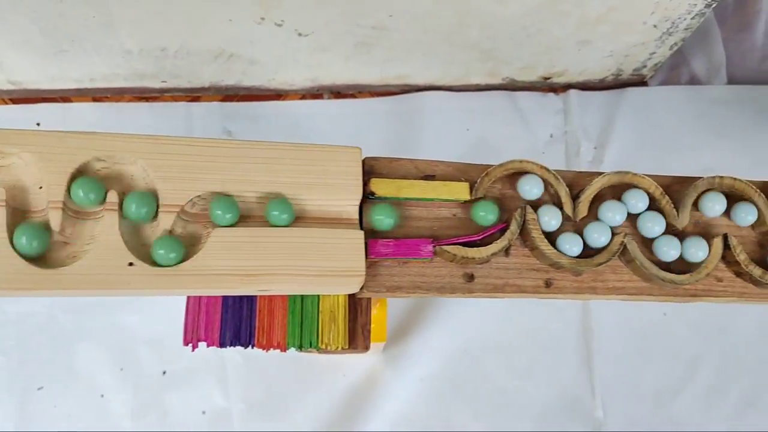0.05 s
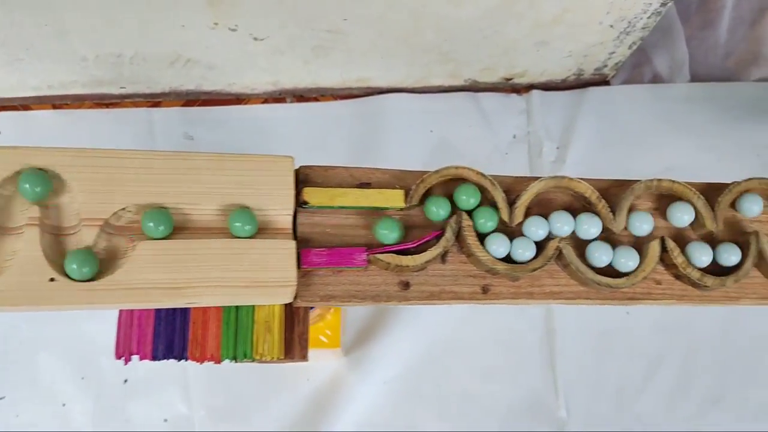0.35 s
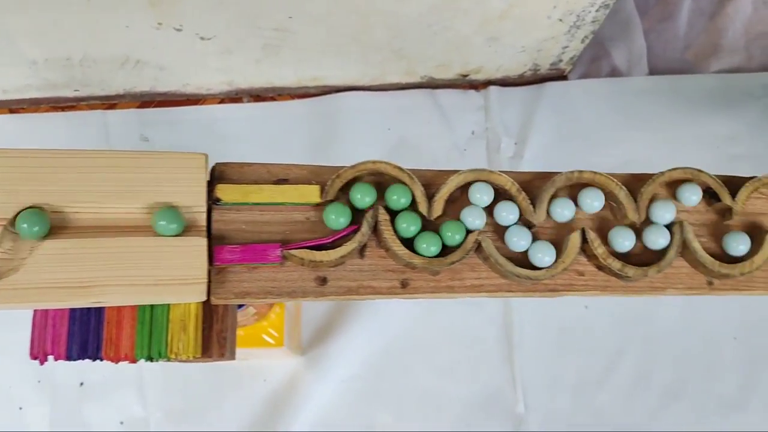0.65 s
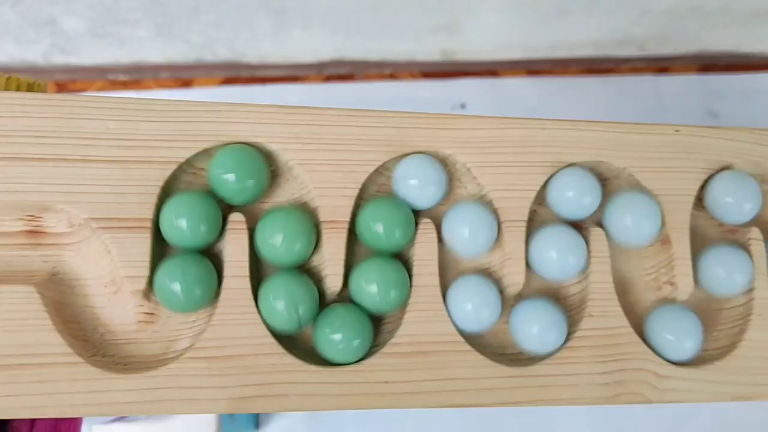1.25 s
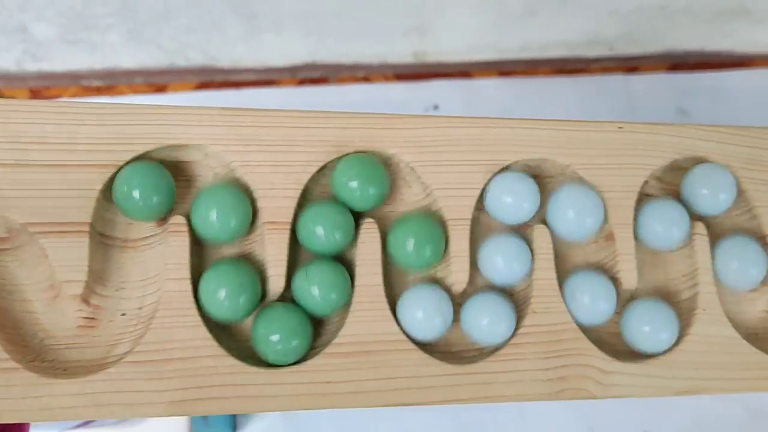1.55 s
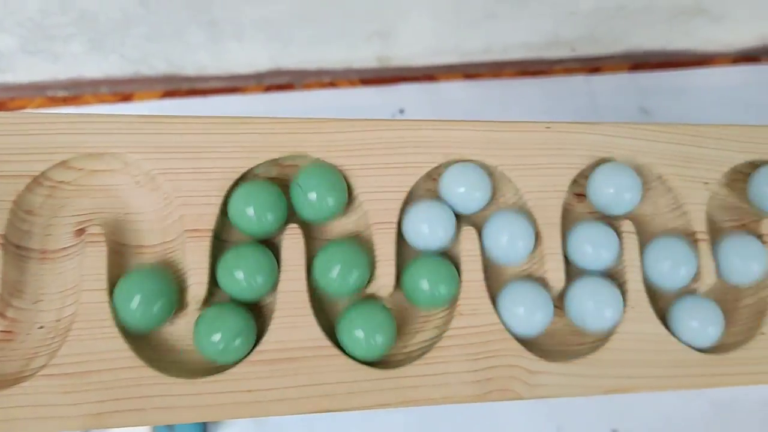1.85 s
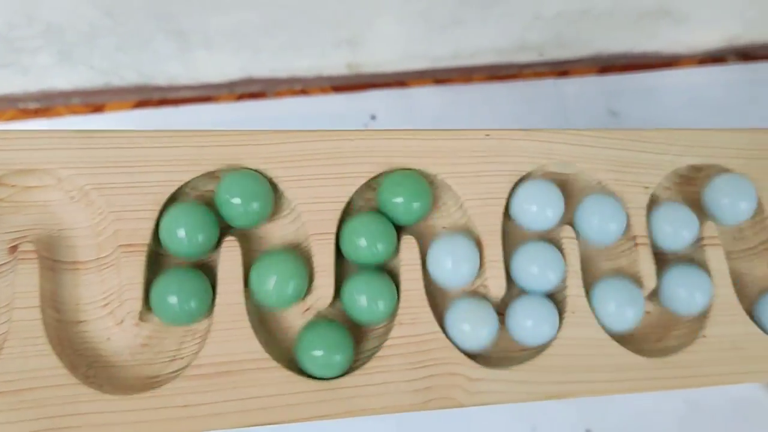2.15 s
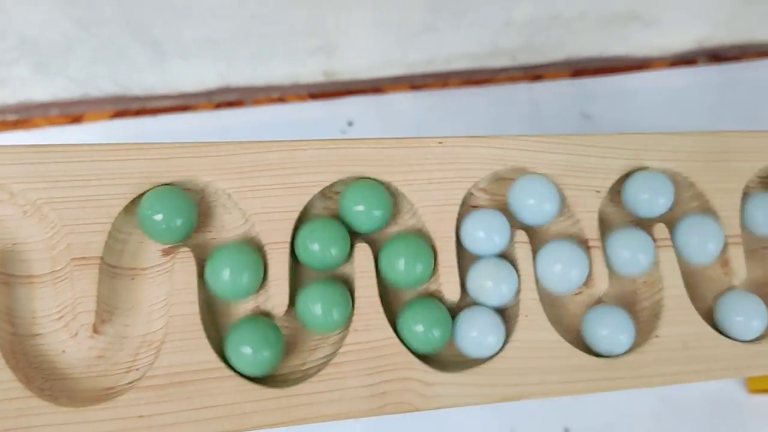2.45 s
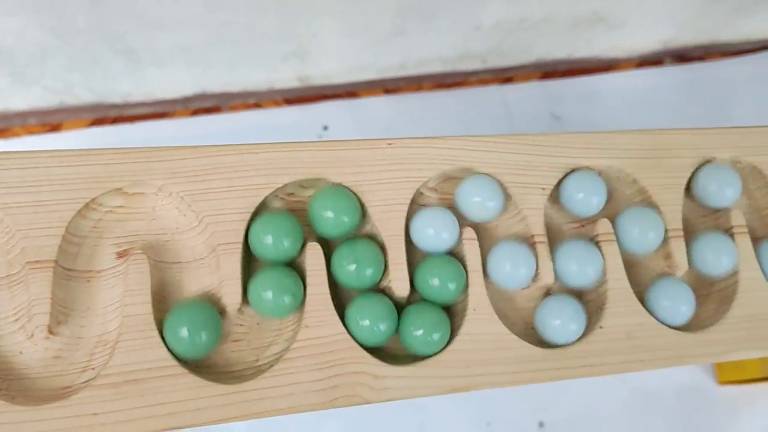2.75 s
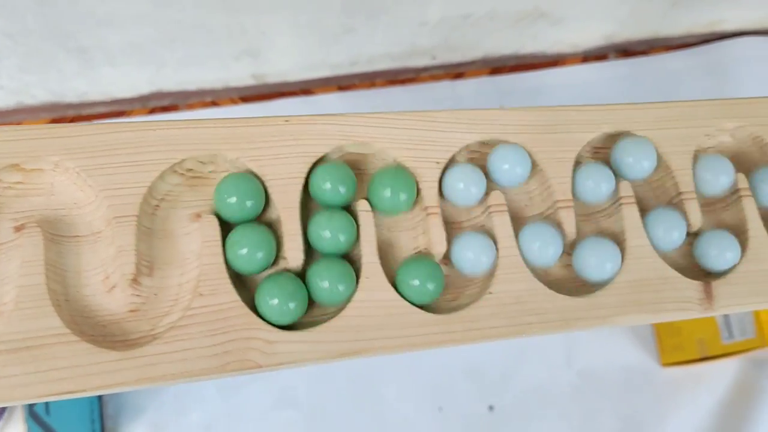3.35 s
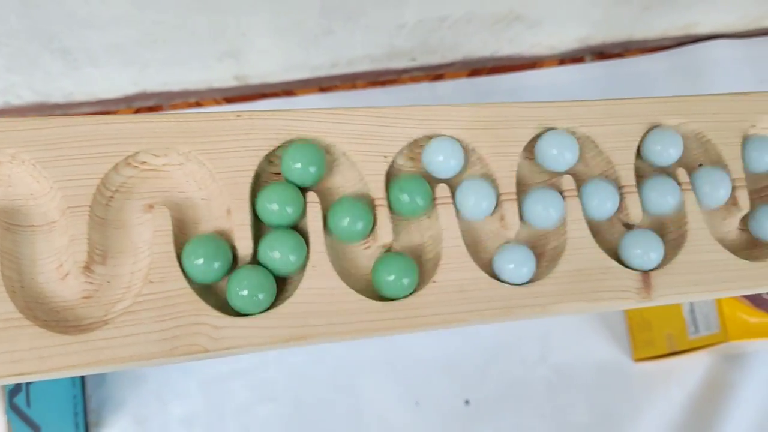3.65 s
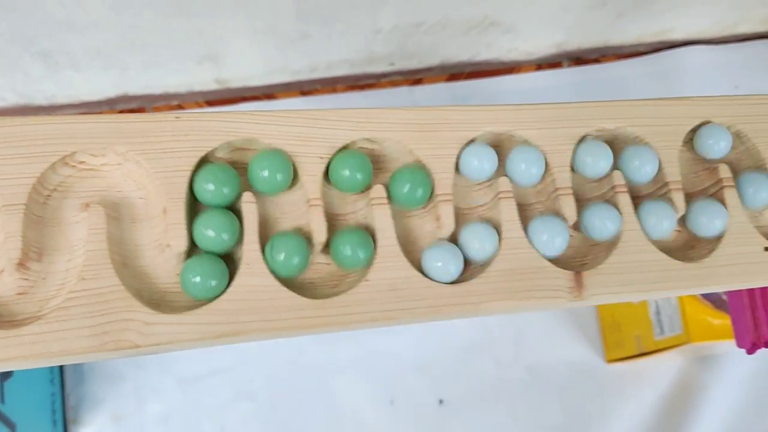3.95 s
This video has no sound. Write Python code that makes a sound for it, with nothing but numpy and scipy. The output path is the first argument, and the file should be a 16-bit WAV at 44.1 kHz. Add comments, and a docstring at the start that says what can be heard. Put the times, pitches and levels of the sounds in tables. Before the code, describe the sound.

Glass marbles roll on wood throughout, in a small room. For the first 1.4 seconds they rattle down a thin run with bright taps, knocks and scattered clicks over a soft rumble. At about 1.5 seconds the sound turns closer, deeper and a little louder as they wind through a thick grooved board. Rapid, irregular wooden knocks and glassy clacks continue over a dull rumble until about 4 seconds.

```python
"""Glass marbles on wood

Marbles roll down a thin wooden run, then, heard closer, along a winding groove in a thick board.
Rolling is a stream of tiny blows that ring the wood; marbles knock on bends and clack together.
The boards and their support rumble under the weight, in a small room."""
import sys
import numpy as np
from scipy import signal
from scipy.fft import rfft, irfft, next_fast_len
from scipy.io import wavfile

SR = 44100
rng = np.random.default_rng(int(sys.argv[2]) if len(sys.argv) > 2 else 0)


def to_wav(s):
    """Save 16-bit WAV."""
    ch = np.atleast_2d(s).T  # columns
    pcm = np.round(np.clip(ch, -1, 1) * 32767)  # PCM
    wavfile.write(sys.argv[1], SR, pcm.astype(np.int16))


N = 176400
BUMPS_PER_S, RATTLES_PER_S = 420, 220
RING_SAMPLES, WIDE_HZ = int(0.2 * SR), 810
SIDES = np.array([[1], [-1]])  # left, right


# Rolling on the run: t/s, level/dB
RUN_ROLL = [(0, -23.5), (.05, -26.5), (.1, -28), (.26, -29.5), (.31, -30.5), (.38, -29), (.45, -28.5),
            (.55, -32), (.61, -25.5), (.665, -36), (.7, -27), (.78, -29), (.9, -31), (1, -33.5),
            (1.199, -36), (1.4, -31.5)]
# Taps on the first bends: t/s, level/dB
HEAD_TAPS = [(0.002, -17), (0.014, -15.5), (0.033, -12), (0.048, -14), (0.072, -20), (0.157, -19),
             (0.199, -25), (0.216, -16.5), (0.241, -21), (0.274, -19.5)]
# Bright modes there: f/Hz, level/dB, t60/s, left-right/dB
HEAD_MODES = [(1774, -1.5, 0.062, -16), (2602, 2, 0.066, -7.5)]
# Marble on wood: t/s, level/dB
RUN_KNOCKS = [(0.017, -11), (0.0362, -11.5), (0.0708, -18), (0.136, -5), (0.2528, -7.5), (0.3345, -8.5),
              (0.365, -11.5), (0.389, -14.5), (0.4773, -6), (0.565, -18.5), (0.597, -4.5), (0.62, -23),
              (0.6902, -10.5), (0.7243, -16), (0.7614, -9), (0.7904, -13.5), (0.9333, -18.5), (0.9454, -5),
              (0.9748, -12.5), (0.997, -17), (1.048, -16.5), (1.1274, -16)]
# Marble on marble: t/s, level/dB, left-right/dB
RUN_CLACKS = [(0.03, -30, 11), (0.097, -28, 10), (0.236, -32, 11), (0.284, -25.5, 6), (0.352, -24.5, 6),
              (0.3804, -22.5, 6), (0.458, -14, 1.5), (0.575, -16, 3), (0.6131, -22, 2), (0.6737, -31, 8),
              (0.691, -25, 8), (0.706, -29, 1), (0.767, -22.5, 7), (0.8637, -11.5, 1.5), (0.9728, -27.5, 8),
              (1.0399, -12, -1.5), (1.059, -20.5, 0), (1.112, -29, 6), (1.127, -17.5, 4), (1.159, -28, 9),
              (1.2094, -24, 3), (1.264, -24.5, 2), (1.3177, -25, 7), (1.3597, -19, -0.5),
              (1.4013, -25.5, 3), (1.428, -24, 3)]
# Glass contact spectrum: f/Hz, level/dB
RUN_GLASS = [(1000, -0.5), (3000, -3.5), (4300, 0.5), (5500, -2), (7000, 1), (8000, -6.5), (9500, 0.5),
             (11000, -3), (12000, -2.5), (14000, -10.5), (16000, -15)]
def thin_run(roll_gain):
    """Marbles roll, rattle, tap, knock and clack on the thin run."""
    bumps = stream(lambda: run_blow(ring_db=-4), BUMPS_PER_S, scatter_db=1)
    roll = colour(follow(bumps, RUN_ROLL) * amp(1), [(300, 10.5), (1000, 8.5), (2500, -0.5), (6000, 1.5)])
    rattle = stream(lambda: clack(RUN_GLASS), RATTLES_PER_S, scatter_db=7)
    swell = [(0, -42.5), (.4, -37.5), (.53, -47), (.7, -34.5), (.98, -46.5), (1.2, -41.5), (1.4, -43)]
    out = (roll + follow(rattle, swell)) * roll_gain
    for t, db in HEAD_TAPS:
        add(out, t, amp(db + 24.5) * ring(HEAD_MODES, scatter_db=0, detune=0.0059, spread=0.34))
    for t, db in RUN_KNOCKS:
        add(out, t, amp(db + 19.5) * run_blow(ring_db=-6.5))
    for t, db, pan_db in RUN_CLACKS:
        add(out, t, amp(db + 19.5 + SIDES * pan_db / 2) * clack(RUN_GLASS))
    return out


# Rolling in the groove: t/s, level/dB
BOARD_ROLL = [(1.38, -17), (1.47, -18), (1.6, -21), (1.65, -16), (1.76, -20.5), (2.01, -23.5),
              (2.08, -28.5), (2.49, -23.5), (2.78, -26.5), (3.2, -24.5), (3.38, -27), (3.8, -26),
              (3.98, -22)]
# Knocks on the bends: t/s, level/dB, low body/dB, hard edge/dB
BOARD_KNOCKS = [(1.425, -14, -21, -37), (1.466, -9, 9, -9), (1.494, -11, -21, -42), (1.531, -34, 14, -28),
                (1.572, -7, -1.5, -18), (1.598, -9.5, -4, -29), (1.648, -11, -1, -32),
                (1.686, -4, -22, -11), (1.745, -4, -25, -5.5), (1.81, -8.5, -11, -19.5),
                (1.858, -7, -6.5, -31.5), (1.883, -9.5, -16, -27), (1.947, -11, -1, -16),
                (1.987, -7.5, -3.5, -8), (2.101, -14, -14, -14), (2.121, -15, 1, -16),
                (2.205, -13.5, -1, -15.5), (2.255, -17, -17, -9), (2.284, -11.5, -19, -19),
                (2.294, -14, -9.5, -22), (2.361, -13.5, 5, -21), (2.378, -9, 3.5, -5),
                (2.45, -13.5, -5, -15), (2.482, -21, -3, -13), (2.524, -16.5, -12, -9),
                (2.562, -7, -4, -14), (2.628, -14, 1.5, -17), (2.674, -15, 0, -1), (2.759, -12, -18, -16),
                (2.842, -16, 3.5, -6), (2.89, -16, 10.5, -2), (2.969, -12.5, 0, -18),
                (3.015, -11, -1.5, -23), (3.103, -12, -7, -37), (3.134, -9.5, -15, -33),
                (3.204, -11, -2, -21.5), (3.313, -10.5, -13, -22.5), (3.332, -20.5, -16, -7),
                (3.425, -12.5, -5, -31), (3.465, -11, -4.5, -21), (3.496, -14, 14, -22),
                (3.529, -9.5, 6, -11.5), (3.637, -16.5, 0, -9), (3.674, -8.5, -2, -21.5),
                (3.703, -11.5, 0, -24), (3.716, -13, -13, -19.5), (3.87, -7, -9, -18),
                (3.888, -7.5, -5.5, -20), (3.939, -10, -9.5, -23.5)]
# Marble on marble: t/s, level/dB
BOARD_CLACKS = [(1.4766, -13.5), (1.559, -24), (1.5898, -18.5), (1.6166, -12.5), (1.6487, -10.5),
                (1.6567, -12.5), (1.704, -24), (1.716, -32), (1.736, -12), (1.787, -15.5), (1.8315, -25.5),
                (1.8798, -21.5), (1.9428, -17.5), (1.955, -16.5), (1.9764, -15), (1.9898, -16.5),
                (2.0365, -15.5), (2.1123, -14.5), (2.1542, -15), (2.159, -22.5), (2.2019, -18.5),
                (2.238, -16.5), (2.282, -20), (2.2914, -21), (2.3796, -14), (2.3829, -12), (2.4516, -22),
                (2.5042, -17), (2.5322, -19), (2.561, -11.5), (2.5999, -11.5), (2.6715, -14.5),
                (2.7034, -20.5), (2.7177, -12), (2.739, -19.5), (2.757, -16), (2.7913, -18),
                (2.8089, -10.5), (2.8983, -17.5), (2.935, -19.5), (2.9509, -12.5), (2.979, -22),
                (3.066, -14), (3.0732, -16.5), (3.1198, -16), (3.1423, -18), (3.159, -27), (3.2084, -19),
                (3.253, -18.5), (3.275, -12.5), (3.3053, -17), (3.4414, -13.5), (3.459, -20), (3.493, -25),
                (3.514, -22), (3.597, -22), (3.6368, -21), (3.724, -20), (3.8458, -17), (3.889, -17.5),
                (3.9012, -22)]
# Glass contact spectrum: f/Hz, level/dB
BOARD_GLASS = [(1000, -26), (2600, -3), (3600, 1.5), (4400, 5), (5100, -4.5), (6000, -2.5), (7200, -2.5),
               (7800, -10), (9000, -12), (10100, -16.5), (11000, -32.5), (16000, -37.5)]
def grooved_board(roll_gain, top_hz=10300):
    """Marbles wind down the groove; harder knocks ring the higher modes. The top is muffled."""
    bumps = stream(lambda: board_blow(ring_db=2, t60_scale=0.89), BUMPS_PER_S, scatter_db=0)
    roll = follow(bumps, BOARD_ROLL) * amp(0.58)
    roll = colour(roll, [(240, 5), (420, 5), (600, 1), (1000, 2), (1600, -3.5), (3000, -3.5)])
    rattle = stream(lambda: clack(BOARD_GLASS), RATTLES_PER_S, scatter_db=4)
    swell = [(1.5, -35.5), (2.1, -47), (2.8, -39.5), (3.4, -49.5), (4, -49.5)]
    out = (roll + follow(rattle, swell)) * roll_gain
    for t, db, body_db, edge_db in BOARD_KNOCKS:
        body = [(550, body_db + 2.5), (1030, 0)]
        edge = [(1700, edge_db + 14), (2000, edge_db + 14.5), (3200, edge_db + 7.5)]
        knock = colour(board_blow(ring_db=3.5, t60_scale=0.67), body + edge)
        add(out, t, amp(db + 23) * unit(rebound(knock)))
    for t, db in BOARD_CLACKS:
        add(out, t, amp(db + 17) * rebound(clack(BOARD_GLASS)))
    return signal.sosfilt(signal.butter(12, top_hz, fs=SR, output="sos"), out)


# Dense, damped modes: f/Hz, level/dB
RUN_WOOD = [(120, -22.5), (300, -8.5), (520, -11.5), (900, -5), (1600, -3), (2600, 0.5), (3100, -8),
            (4300, -14), (5200, -22.5), (9000, -57), (16000, -59)]
# Ringing modes: f/Hz, level/dB, t60/s, left-right/dB
RUN_MODES = [(749, -8.5, 0.043, -2.5), (989, -9, 0.17, -6), (1091, -6.5, 0.21, -6),
             (1695, -2.5, 0.04, -12.5), (2100, -33, 0.024, 16), (2296, -4, 0.14, -11),
             (2595, -8.5, 0.045, -29)]
def run_blow(ring_db):
    """One blow rings the thin run, slightly to the right."""
    crack = burst(RUN_WOOD, t60_s=0.022, tail_db=-2.5, tail_t60_s=0.094, snap_db=-8)
    tone = ring(RUN_MODES, scatter_db=1, detune=0.009, spread=0.56)
    return unit(crack * amp(-1.23 * SIDES) + amp(ring_db) * tone)


# Dense, damped modes: f/Hz, level/dB
BOARD_WOOD = [(120, -15), (235, -16), (300, -2.5), (480, -3), (650, 2), (760, -2), (840, -19), (1000, -3.5),
              (1250, -9), (1650, -17), (2100, -18), (2700, -19), (3200, -46.5), (6000, -34.5), (12000, -58)]
# Ringing modes: f/Hz, level/dB, unscaled t60/s, left-right/dB
BOARD_MODES = [(292, -20, 0.039, 0.5), (350.7, -6, 0.11, -2.5), (586.9, -2.5, 0.24, 17),
               (683, -12, 0.033, -25.5), (953, -5.5, 0.16, 6), (1034.5, 2.5, 0.21, -2),
               (1391, -8.5, 0.094, -10), (1528, -5, 0.23, -1), (1553, 1, 0.072, -2), (1875, -11, 0.13, -7),
               (2354, -16, 0.11, -8.5)]
def board_blow(ring_db, t60_scale):
    """One blow rings the thick board."""
    crack = burst(BOARD_WOOD, t60_s=0.033, tail_db=-13, tail_t60_s=0.098, snap_db=-13)
    tone = ring(BOARD_MODES, scatter_db=0.5, detune=0.0041, spread=0.36, t60_scale=t60_scale)
    return unit(crack + amp(ring_db) * tone)


def clack(spectrum, ripple_db=3):
    """Glass hits glass: a short crack, coloured differently at each place on the wood."""
    crack = burst(spectrum, t60_s=0.027, tail_db=-17, tail_t60_s=0.09, snap_db=-6)
    ripple = zip(np.geomspace(2500, 15000, 22), ripple_db * rng.standard_normal(22))
    return unit(colour(crack, list(ripple)))


def rebound(x, lag_s=(0.004, 0.02), level_db=-11):
    """A marble bounces and touches again, weaker."""
    lag = int(rng.uniform(*lag_s) * SR)
    return x + amp(level_db) * np.pad(x, ((0, 0), (lag, 0)))[:, :x.shape[1]]


def ring(modes, scatter_db, detune, spread, t60_scale=1):
    """Struck wood modes; strength and sign depend on where the blow lands."""
    t, out = np.arange(RING_SAMPLES) / SR, 0
    for hz, db, t60_s, pan_db in modes:
        strength, pitch, skew, polarity = rng.standard_normal(4)
        stereo_phase = SIDES * skew * spread * hz / WIDE_HZ
        wave = np.sin(2 * np.pi * hz * (1 + detune * pitch) * t + stereo_phase)
        gain = np.sign(polarity) * amp(db + scatter_db * strength + SIDES * pan_db / 2)
        out = out + gain * unit(wave * decay(t60_s * t60_scale))
    return unit(out)


def burst(spectrum, t60_s, tail_db, tail_t60_s, snap_db):
    """Contact noise: sharp snap, short crack, weaker tail."""
    envelope = decay(t60_s) + amp(tail_db) * decay(tail_t60_s)
    crack = unit(stereo_noise(RING_SAMPLES) * envelope)
    crack[0, 0] += amp(snap_db)
    crack[1, rng.integers(0, 10)] += amp(snap_db)
    return unit(colour(crack, spectrum))


def stream(blow, rate_per_s, scatter_db, places=8):
    """Random small blows at several places on the wood."""
    out = 0
    for _ in range(places):
        sizes = amp(scatter_db * np.clip(rng.standard_normal(N), -2, 2))
        hits = sizes * (rng.random(N) < rate_per_s / places / SR)
        out = out + signal.oaconvolve(hits[None], blow(), axes=1)[:, :N]
    return out


# Rumble envelope: t/s, level/dB
RUMBLE_LEVEL = [(0, -29), (.6, -29.5), (.8, -29.5), (1.2, -31.5), (1.42, -27.5), (1.49, -18), (1.68, -21.5),
                (1.95, -24.5), (2.1, -32.5), (2.4, -28), (2.7, -26.5), (3.2, -25.5), (4, -22.5)]
# Rumble spectra: f/Hz, level/dB
RUN_RUMBLE = [(10, -37), (22, -15), (40, -13.5), (90, -9.5), (128, -2.5), (150, -10), (175, 1), (205, -7.5),
              (280, -25), (420, -18), (900, -50.5)]
BOARD_RUMBLE = [(10, -51), (22, -10), (36, -14.5), (60, -1), (86, 0), (105, -2), (150, -11), (190, -14.5),
                (240, -38), (420, -11.5), (900, -86)]
def rumble(run_gain, board_gain):
    """The rolling weight shakes the boards and their support."""
    thin = follow(colour(stereo_noise(N), RUN_RUMBLE), RUMBLE_LEVEL)
    thick = follow(colour(stereo_noise(N), BOARD_RUMBLE), RUMBLE_LEVEL)
    return amp(-0.4) * (thin * run_gain + thick * board_gain)


def room(x, delay_s=0.013, t60_s=0.11, wet_db=-14.5):
    """Short, diffuse reflections from nearby walls."""
    onset = np.clip(np.arange(RING_SAMPLES) / SR / delay_s - 1, 0, 1)
    response = unit(stereo_noise(RING_SAMPLES) * decay(t60_s) * onset)
    return x + amp(wet_db) * signal.oaconvolve(x, response, axes=1)[:, :N]


def stereo_noise(size, bass_side_db=-18):
    """Noise, alike on both sides below WIDE_HZ, unrelated above."""
    mid, side = rng.standard_normal((2, size))
    side = signal.sosfilt(signal.butter(2, WIDE_HZ, "high", fs=SR, output="sos"), side)
    side += amp(bass_side_db) * rng.standard_normal(size)
    return mid + SIDES * side


def colour(x, points):
    """Minimum-phase filter through (f/Hz, level/dB) points."""
    n = x.shape[-1]
    size = next_fast_len(n + 4096, True) * 2
    hz, db = np.array(points).T
    bin_hz = np.arange(size // 2 + 1) * SR / size
    gain = amp(np.interp(np.log(bin_hz + 1), np.log(hz), db))
    cepstrum = irfft(np.log(gain))
    cepstrum[1:size // 2] *= 2
    cepstrum[size // 2 + 1:] = 0
    return irfft(rfft(x, size) * np.exp(rfft(cepstrum)))[..., :n]


def follow(x, curve):
    """Give a steady sound a (t/s, level/dB) envelope."""
    return unit(x) * np.sqrt(N) * amp(np.interp(np.arange(N) / SR, *np.array(curve).T))


def decay(t60_s):
    """Exponential decay, one ring long."""
    return np.exp(-np.log(1000) * np.arange(RING_SAMPLES) / SR / t60_s)


def amp(db):
    """Decibels to gain."""
    return 10 ** (np.asarray(db) / 20)


def unit(x):
    """Scale to unit mean energy per channel."""
    return x / np.sqrt(np.sum(x ** 2) / 2)


def add(out, start_s, x):
    """Mix x in at start_s."""
    i = int(start_s * SR)
    out[:, i:i + x.shape[1]] += x[:, :N - i]


def scene():
    """The thin run, then the grooved board, over their rumble."""
    change_s, crossfade_s = 1.451, 0.089
    on_board = np.clip((np.arange(N) / SR - change_s) / crossfade_s + .5, 0, 1)
    run_gain, board_gain = np.sqrt(1 - on_board), np.sqrt(on_board)
    return room(thin_run(run_gain) + grooved_board(board_gain)) + rumble(run_gain, board_gain)


def record(dry):
    """Clip at full scale, low-pass at 15.9 kHz."""
    return signal.sosfilt(signal.ellip(8, .2, 80, 15900, fs=SR, output="sos"), np.clip(dry, -1, 1))


dry = scene()
out = record(dry)
to_wav(out)
```